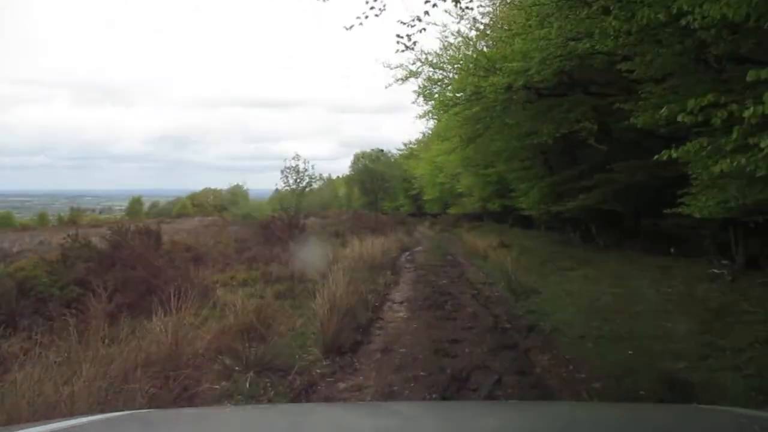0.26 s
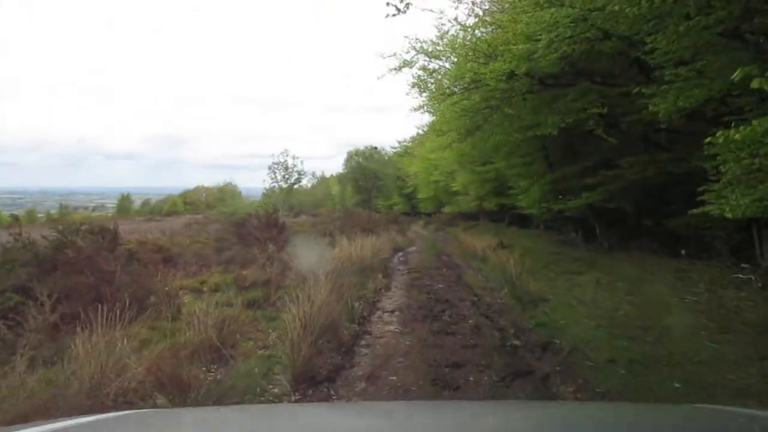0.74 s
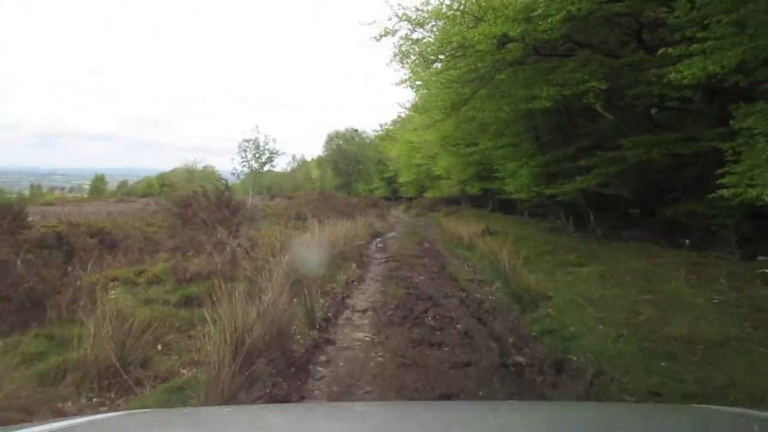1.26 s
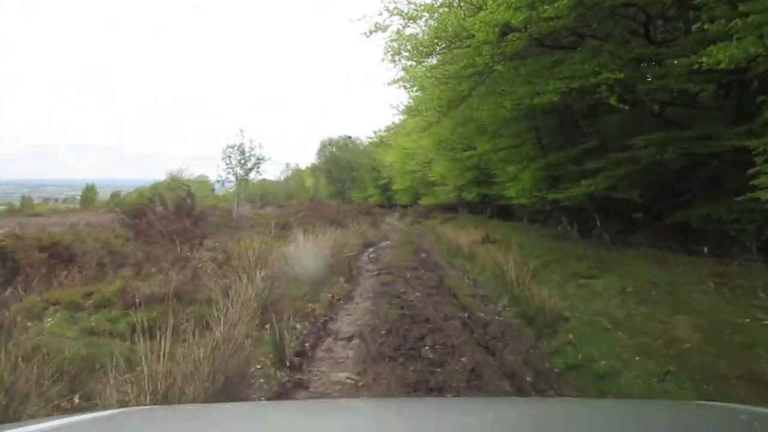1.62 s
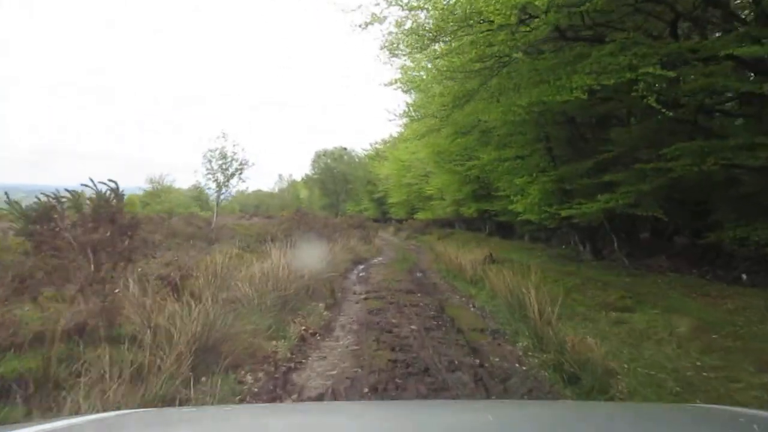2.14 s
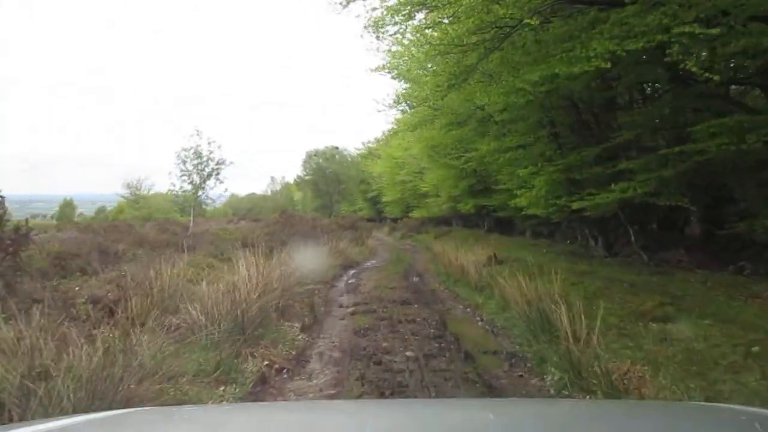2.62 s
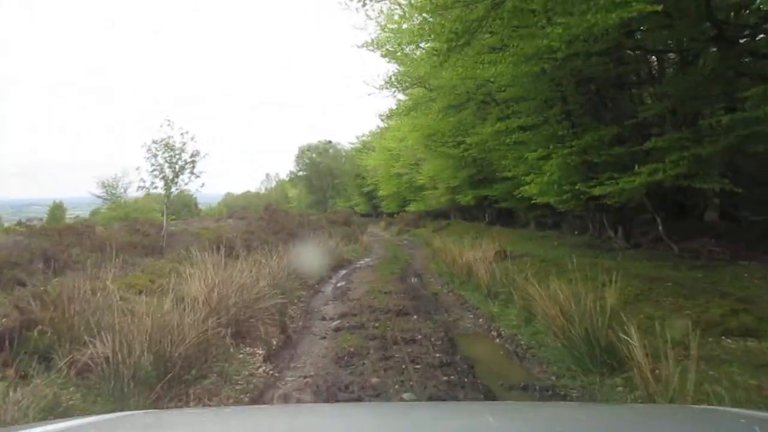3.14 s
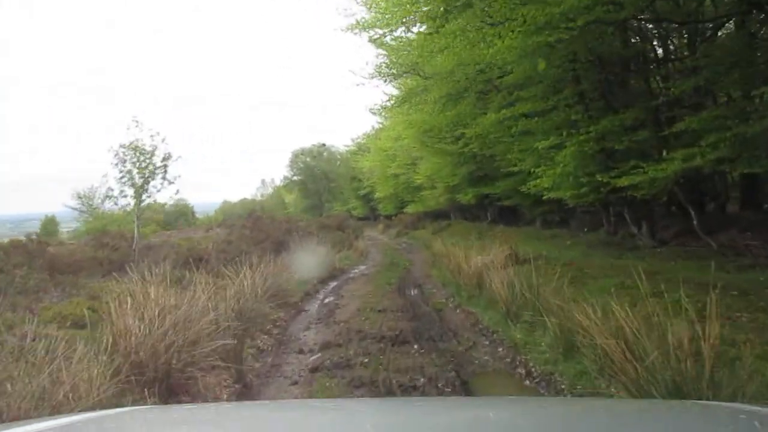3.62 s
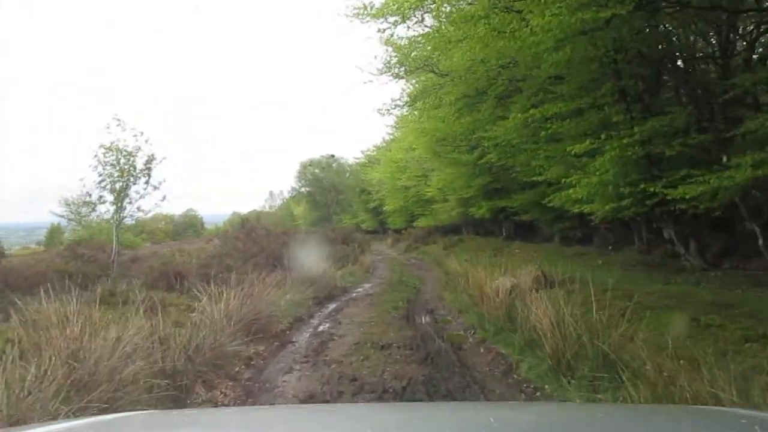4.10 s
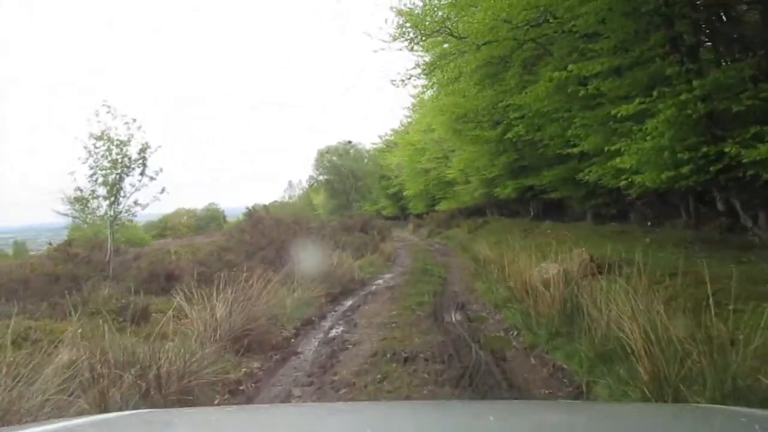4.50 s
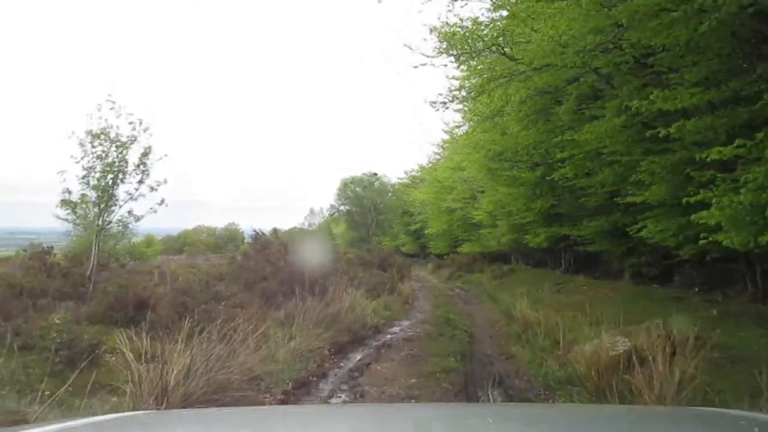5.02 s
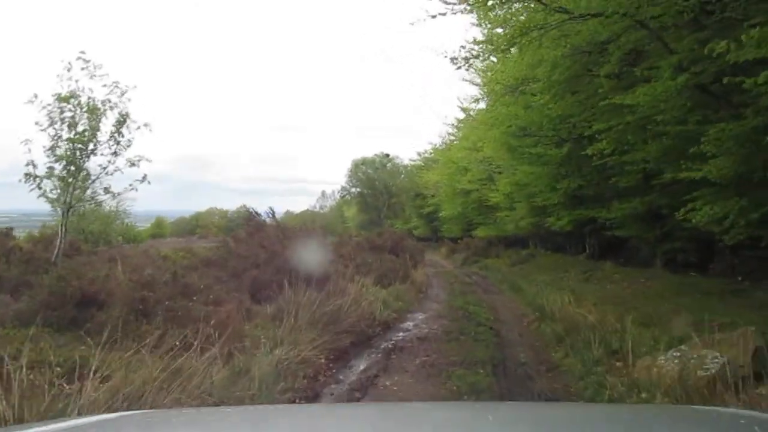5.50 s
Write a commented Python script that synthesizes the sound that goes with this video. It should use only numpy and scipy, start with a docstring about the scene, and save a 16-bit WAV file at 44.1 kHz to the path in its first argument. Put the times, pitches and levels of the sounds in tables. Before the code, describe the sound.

Inside a small off-roader crawling along a muddy rutted track: low steady engine drone, tyre rumble, suspension thumps and rattling trim.

```python
"""The engine of a small four-wheel-drive car drones at nearly steady revs, heard from inside on a rutted muddy track.
It is a sum of wavering firing orders; filtered noise sways the body, and random impacts make tyre rumble and chatter.
Ruts thump the suspension with decaying low tones; noise bursts make pebble taps, trim knocks, ticks and clicks.
Trim judders and a loose fitting clatters in runs of contacts; a small metal piece like a key jingles in decaying modes."""
import sys
import numpy as np
from scipy import signal
from scipy.fft import rfft, irfft, next_fast_len
from scipy.io import wavfile
from scipy.ndimage import uniform_filter1d, map_coordinates

SR = 44100
rng = np.random.default_rng(int(sys.argv[2]) if len(sys.argv) > 2 else 0)


def wav_record(signal):
    """Record a signal, one row per channel, as 16-bit PCM in the file named by sys.argv[1]."""
    frames = np.transpose(np.atleast_2d(signal))
    bounded = np.clip(frames, -1, 1)
    # unit amplitude maps onto the largest positive 16-bit level
    quanta = np.round(bounded * 32767).astype(np.int16)
    wavfile.write(sys.argv[1], SR, quanta)


N = 253575
TIME = np.arange(N) / SR  # seconds
AFTER = np.arange(SR // 4) / SR  # seconds since a blow

# Wheels dropping into ruts. Each row: start in seconds, shell level in dB, shell resonance in Hz,
# low push peak in dB.
RUT_DROPS = [(0.089, -10, 267, -27), (0.42, -31, 136, -7.5), (0.87, -15, 140, -20), (0.984, -17, 320, -21),
             (1.015, -21, 130, -22), (1.213, -26, 137, -21), (1.271, -13.5, 278, -19),
             (1.49, -17, 125, -20), (1.663, -14.5, 138, -18), (1.81, -15, 134, -21), (1.884, -9, 219, -12),
             (1.891, -10.5, 124, -6.5), (2.555, -5.5, 128, -5), (2.56, -15.5, 254, -3),
             (3.342, -13.5, 135, -20), (3.356, -18.5, 262, -29), (3.592, -18.5, 475, -21),
             (3.657, -5, 142, -11), (4.355, -17, 306, -12), (4.391, -13, 295, -22), (4.585, -14, 284, -27),
             (4.774, -16, 280, -22), (4.833, -13.5, 302, -22), (5.221, -16, 124, -3),
             (5.348, -11.5, 296, -30), (5.518, -12.5, 291.2, -13), (5.64, -10, 294.4, -12)]
# Colour of trim contacts. Each row: frequency in Hz, level in dB.
TRIM_COLOUR = [(500, -9), (900, 6), (1350, 0), (1900, -3), (2400, -7), (3300, -10.5), (4700, -20),
               (7000, -29), (11000, -36), (15000, -51.5)]
# Colour of hard plastic and of the key's scrape. Each row: frequency in Hz, level in dB.
PLASTIC_COLOUR = [(2000, -37.5), (3800, 10), (4700, 6), (5400, 0.5), (6200, 3.5), (7200, -3.5),
                  (8400, -0.5), (9200, -3), (10300, -4.5), (12000, -4.5), (15500, -15.5)]


def amp(db):
    """Decibels to gain."""
    return 10 ** (np.asarray(db) / 20)


def unit(x):
    """Scale to rms 1."""
    return x / np.sqrt(np.mean(x ** 2) + 1e-20)


def curves(rows):
    """One value per sample for each column after the time."""
    s, *cols = np.transpose(rows)
    return [np.interp(TIME, s, c) for c in cols]


def wobble(rate):
    """A smooth random curve, rate knots a second."""
    knots = rng.standard_normal(int(N * rate / SR) + 4)
    return map_coordinates(knots, [TIME * rate])


def colour(x, points, main_hz=1000, lift_db=0, octaves=0.3):
    """Causal filter through (Hz, dB) points, with an optional hump round main_hz."""
    m = 2 * next_fast_len(len(x) // 2 + 4096)
    pitch = np.log2(np.fft.rfftfreq(m, 1 / SR) + 1)
    f, db = np.transpose(points)
    # beyond the outer points the level falls 30 dB an octave
    edge = np.maximum(np.log2(f[0]) - pitch, 0) + np.maximum(pitch - np.log2(f[-1]), 0)
    db = np.interp(pitch, np.log2(f), db) - 30 * edge
    db = db + lift_db * np.exp(-((pitch - np.log2(main_hz)) / octaves) ** 2)
    # folding the cepstrum gives minimum phase, so nothing sounds before its blow
    cepstrum = irfft(np.log(amp(db) + 1e-6))
    cepstrum[1:m // 2] *= 2
    cepstrum[m // 2 + 1:] = 0
    return irfft(rfft(x, m) * np.exp(rfft(cepstrum)))[:len(x)]


def resonate(x, modes):
    """Pass x through (Hz, width in Hz, dB) resonances."""
    f = np.fft.rfftfreq(2 * N, 1 / SR)
    response = sum(amp(db) * 1j * f * w / (c * c - f * f + 1j * f * w) for c, w, db in modes)
    return irfft(rfft(x, 2 * N) * response)[:N]


def grains(rate, spread_db):
    """Random tiny impacts of uneven size, rate a second, rms 1."""
    hits = (rng.random(N) < rate / SR) * rng.choice([-1, 1], N)
    size_db = spread_db * np.clip(rng.standard_normal(N), -2, 2)
    return unit(hits * amp(size_db))


def burst(t60):
    """The dying scatter of one contact: noise that falls 60 dB in t60 seconds."""
    return rng.standard_normal(len(AFTER)) * amp(-60 * AFTER / t60)


def add(track, s, db, sound):
    """Lay a sound on the track at s seconds with this peak level."""
    part = track[max(round(s * SR), 0):][:len(sound)]
    part += amp(db) * sound[:len(part)] / np.abs(sound).max()


def rattle(rate, spread_db, centre_hz, cycles):
    """Many small contacts, each ringing briefly at its own pitch; rms 1."""
    when, pitch, size = rng.random((int(rate * N / SR), 3)).T[:, :, None]
    hz = centre_hz * 2 ** (2 * pitch - 1)
    t = AFTER[:SR // 32]
    level = amp(spread_db * size ** 2) * centre_hz / hz
    envelope = amp(-60 * t * hz / cycles) * (1 - np.exp(-t * hz / 2))
    rings = level * np.sin(2 * np.pi * hz * t) * envelope
    places = (when * N).astype(int) + np.arange(len(t))
    return unit(np.bincount(places.ravel(), rings.ravel(), N)[:N])


def ground():
    """Levels of stones and lumps under the wheels (dB), and the stoniness about its mean."""
    # Roughness of the track. Each row: time in seconds, stones in dB, lumps in dB.
    roughness = [(0, -30, -27), (0.22, -35, -24), (0.55, -34, -24), (0.95, -34, -21.5), (1.3, -35, -22),
                 (1.72, -37.5, -22.5), (2.1, -40.5, -28), (2.36, -41, -30), (2.55, -36, -26.5),
                 (2.8, -42.5, -30.5), (3.22, -41, -34), (3.6, -37.5, -24.5), (3.87, -38, -28),
                 (4.35, -35, -23.5), (4.72, -35.5, -27), (5.2, -32, -22), (5.5, -36, -28), (5.75, -33, -25)]
    stones_db, lumps_db = curves(roughness)
    return stones_db, lumps_db, stones_db - stones_db.mean()


def ruts(rut_s=0.053):
    """The shake of the car round each rut, 1 for the loudest alone; close ruts add up."""
    loudest_db = max(row[1] for row in RUT_DROPS)
    return sum(amp(db - loudest_db) * np.exp(-((TIME - s) / rut_s) ** 2) for s, db, *_ in RUT_DROPS)


def cabin(x, wet_db=-9, t60=0.08):
    """Glass and roof return a short, close echo; the seats soak up its treble."""
    tail = burst(t60) * (AFTER > .003)
    echo = signal.fftconvolve(x, tail / np.linalg.norm(tail))[:N]
    return x + amp(wet_db) * colour(echo, [(100, 4.5), (4000, 0.5), (15000, -8.5)])


def clicks(level_db=0.0, t60=0.006, tail_db=-20, tail_t60=0.035, lift_db=11):
    """Small hard parts click: one sharp contact, over in milliseconds, with a thin bright tail."""
    # Each row: start in seconds, peak in dB, main pitch in Hz.
    sharp_contacts = [(0.273, -36, 9100), (0.2866, -30, 7500), (0.2887, -19, 13100), (5.6857, -23.5, 10300)]
    # Each row: frequency in Hz, level in dB.
    click_colour = [(2000, -27), (4200, 3), (5300, -3), (7000, -0.5), (8400, 1), (10200, -3), (11700, -2.5),
                    (13500, -11), (15500, -19.5)]
    out = np.zeros(N)
    for s, db, hz in sharp_contacts:
        contact = burst(t60) + amp(tail_db) * burst(tail_t60)
        click = colour(contact, click_colour, main_hz=hz, lift_db=lift_db, octaves=.2)
        add(out, s, db + level_db, click)
    return out


def touches(count=2, rebound_s=0.02, rebound_loss_db=18):
    """Each swing of the key touches its ring and rebounds once, more softly: rows (s, dB)."""
    # Each row: start in seconds, level in dB.
    swings = [(0.001, -32), (0.055, -40), (0.074, -32), (0.429, -41.5), (0.455, -38), (0.899, -48),
              (1.393, -47), (1.462, -54), (1.509, -51), (2.231, -40.5), (2.258, -48), (2.653, -46),
              (4.398, -46), (4.426, -44), (5.342, -31), (5.367, -40.5)]
    return [(s + rebound_s * k, db - rebound_loss_db * k) for s, db in swings for k in range(count)]


def jingles(level_db=-2, scrape_db=-8, rough=0.63):
    """Each touch rings the key's modes at new strengths; rubbing on the ring blurs them."""
    # Modes of the key. Each row: frequency in Hz, level in dB, time to fall 60 dB in seconds.
    key_modes = [(5800, -15, .04), (7400, -18, .05), (11490, 0, .08), (11780, -5.5, .06), (12100, -12, .05),
                 (14930, -6, .06), (15200, -12, .05)]
    out = np.zeros(N)
    for s, db in touches():
        ring = np.zeros(len(AFTER))
        for hz, level, t60 in key_modes:
            # a random walk in phase
            drift = rough * np.cumsum(rng.standard_normal(len(AFTER))) / np.sqrt(SR * 0.00098)
            strength = amp(level + 2.0 * rng.normal() - 60 * AFTER / t60)
            ring += strength * np.sin(2 * np.pi * hz * AFTER + drift)
        scrape = amp(scrape_db) * colour(burst(0.035), PLASTIC_COLOUR)
        add(out, s, db + level_db, ring * (1 - np.exp(-AFTER / 0.0013)) + scrape)
    return out


def faint_ticks(per_s=9.1, over_stones_db=-7.5, centre_hz=6000, spread_db=6):
    """Small ticks at random moments, stronger on stony ground: rows (s, dB, main Hz)."""
    stones_db = ground()[0]
    rows = []
    for when, size, pitch in rng.random((int(per_s * N / SR), 3)):
        db = stones_db[int(when * N)] + over_stones_db - spread_db * size
        rows.append((when * N / SR, db, centre_hz * 2 ** (pitch - .5)))
    return rows


def ticks(level_db=-2.5, tail_db=-19, dull_db=9):
    """Hard plastic parts snap together, each with its own pitch; softer contacts are duller."""
    # Each row: start in seconds, level in dB, main pitch in Hz.
    snaps = [(0.057, -42, 12000), (0.13, -32, 4730), (0.147, -37, 9500), (0.29, -27.5, 7000),
             (0.336, -31, 6470), (0.426, -37, 4300), (0.713, -32.5, 6370), (0.74, -32, 5880),
             (0.858, -35.5, 4830), (0.869, -35, 4200), (0.937, -33, 10000), (0.961, -37, 4200),
             (0.977, -31, 4100), (1.016, -37, 8500), (1.278, -45.5, 5500), (1.395, -35, 5000),
             (1.405, -34, 5090), (1.571, -41, 6000), (1.736, -34, 6100), (1.779, -37, 4850),
             (1.801, -39, 4900), (1.861, -33, 5150), (1.874, -29.5, 5000), (1.893, -33.5, 6000),
             (1.964, -42.5, 10000), (2.231, -36, 4200), (2.346, -40, 6120), (2.406, -47, 5870),
             (2.531, -32, 4480), (2.557, -39, 5500), (2.605, -37, 4900), (2.746, -41, 5260),
             (2.903, -46, 8000), (2.965, -38, 5160), (3.467, -45, 6000), (3.585, -36, 5330),
             (4.394, -41.5, 6000), (4.704, -37, 5120), (5.093, -34.5, 8310), (5.102, -37, 8300),
             (5.144, -40, 7000), (5.183, -42, 6500), (5.279, -34, 4800), (5.34, -34, 6200),
             (5.613, -43, 5600), (5.646, -40, 6000), (5.656, -41.5, 6000), (5.718, -37, 6200)]
    out = np.zeros(N)
    hardest_db = max(row[1] for row in snaps)
    for s, db, hz in snaps + faint_ticks():
        contact = (burst(.013) + amp(tail_db) * burst(.055)) * (1 - np.exp(-AFTER / .002))
        snap = colour(contact, PLASTIC_COLOUR, main_hz=hz, lift_db=5, octaves=.35)
        softness = 1 - amp(db - hardest_db)
        dulled = colour(snap, [(1000, 0.0074), (5000, 0.0058), (15000, -dull_db * softness)])
        add(out, s, db + level_db, dulled)
    return out


def pebbles(per_s=26, over_stones_db=2, centre_hz=2180, spread_db=8, t60=0.025, small_db=5):
    """Stones flung from the tread tap the floor pan at their own pitch; smaller ones are higher and weaker."""
    out = np.zeros(N)
    stones_db = ground()[0]
    for when, size, pitch in rng.random((int(per_s * N / SR), 3)):
        octave = 2 * pitch - 1
        tap = colour(burst(t60), TRIM_COLOUR, main_hz=centre_hz * 2 ** octave, lift_db=16, octaves=.2)
        db = stones_db[int(when * N)] + over_stones_db - spread_db * size - small_db * octave
        add(out, when * N / SR, db, tap)
    return out


def clatters(contacts_per_s=1500):
    """A swelling run of quick contacts rings a loose metal fitting's modes; one sings on afterwards."""
    # Each row: crest in seconds, half length in seconds, level in dB.
    swells = [(0.089, 0.019, -25)]
    # Modes of the fitting. Each row: frequency in Hz, level in dB, time to fall 60 dB in seconds.
    fitting_modes = [(1350, -1, .04), (1630, -2, .28), (1560, -5, .12), (1700, -7, .2), (1825, -2, .08),
                     (1965, -3, .05), (2270, -6, .03), (2600, -11, .025)]
    out = np.zeros(N)
    for s, half, db in swells:
        contacts = grains(contacts_per_s, spread_db=1.5) * np.exp(-((TIME - s) / half) ** 2)
        for hz, level, t60 in fitting_modes:
            mode = np.sin(2 * np.pi * hz * AFTER) * amp(-60 * AFTER / t60)
            add(out, 0, db + level, signal.fftconvolve(contacts, mode)[:N])
    return out


def judders(level_db=0.0, ring_db=-6, dull_db=12):
    """Loose trim rasps in a swelling run of quick contacts that ring its main resonance."""
    # Each row: crest in seconds, half length in seconds, level in dB, main pitch in Hz.
    runs = [(0.086, 0.026, -32, 1780), (0.09, 0.017, -33, 890), (1.845, 0.037, -33.5, 790),
            (1.881, 0.011, -37.5, 2470), (2.54, 0.012, -37.5, 2100), (2.547, 0.048, -39.5, 1120),
            (3.59, 0.0065, -36, 2350), (3.686, 0.046, -41.5, 2201), (3.746, 0.018, -35, 1310),
            (4.448, 0.035, -37.5, 1730), (4.862, 0.031, -31.5, 1390), (5.202, 0.067, -43, 2200),
            (5.642, 0.022, -30, 1390)]
    out = np.zeros(N)
    for s, half, db, hz in runs:
        contacts = grains(900, spread_db=6.5)
        rasp = unit(colour(contacts, TRIM_COLOUR, main_hz=hz, lift_db=14, octaves=.35))
        ring = unit(resonate(grains(900, spread_db=9.0), [(hz, hz / 12, 0)]))
        swell = np.exp(-((TIME - s) / half) ** 2)
        out += amp(db + level_db) * swell * unit(rasp + amp(min(ring_db, 0)) * ring)
    return colour(out, [(100, 0), (3500, 0.0082), (10000, -dull_db)])


def knocks(clack_db=0, hollow_db=-5, ring_db=0, ring_t60=0.027):
    """Trim clacks against the shell and rings briefly; the cavity behind adds a hollow note."""
    # Each row: start in seconds, clack in dB, hollow body in dB, ring in dB, ring pitch in Hz.
    trim_blows = [(0.324, -25.5, -23, -37, 1560), (0.424, -17, -24, -23, 960),
                  (0.893, -22.5, -15.5, -40, 1430), (0.999, -30, -22, -44, 2980),
                  (1.043, -26, -21, -28.5, 1625), (1.872, -26.5, -13, -42, 2570),
                  (1.88, -28, -22, -39, 2180), (2.23, -23.5, -15, -30, 1001),
                  (2.238, -27.5, -18, -44, 1199), (2.406, -31.5, -20, -50, 2660),
                  (2.531, -24.5, -20, -32, 2350), (2.543, -33, -19, -42, 1900),
                  (2.581, -27.5, -24, -43.5, 1698), (2.604, -27.5, -33, -41, 1640),
                  (2.849, -35.5, -24, -42, 1100), (3.583, -22, -18, -28, 1400),
                  (3.649, -29, -26, -36, 1140), (3.703, -25.5, -16, -30, 2330),
                  (3.766, -31, -12, -23.5, 963), (3.963, -27, -9, -36, 1490),
                  (4.201, -29.5, -12, -43, 2090), (4.215, -27, -17, -44, 2067),
                  (4.264, -28, -22, -27, 1301), (4.273, -30, -22, -31, 1910), (4.391, -23, -11, -35, 1190),
                  (4.452, -28.5, -22, -30, 1343), (4.461, -31, -18, -42, 1990),
                  (4.545, -27, -34, -38, 1300), (4.844, -25, -13, -37, 1210), (4.862, -29, -17, -41, 1470),
                  (5.058, -23, -20, -37, 2150), (5.237, -21, -16, -45, 1410),
                  (5.339, -21, -13, -32.5, 3270), (5.347, -24.5, -16, -30, 1080),
                  (5.376, -26, -20, -36, 1000), (5.614, -32, -14, -33, 1270),
                  (5.643, -22.5, -15.5, -38, 1380), (5.69, -23, -13, -25, 1290)]
    # Colour of the cavity. Each row: frequency in Hz, level in dB.
    hollow_colour = [(120, -9), (230, 6), (300, 12.5), (450, 1), (700, -3), (1200, -18)]
    out = np.zeros(N)
    for s, db, body_db, note_db, hz in trim_blows:
        # the surfaces chatter evenly for a few milliseconds before the sound dies away
        fade = amp(-60 * np.maximum(AFTER - .004, 0) / 0.04)
        contact = np.sign(rng.standard_normal(len(AFTER))) * fade
        clack = colour(contact, TRIM_COLOUR, main_hz=hz, lift_db=4.0, octaves=0.17)
        add(out, s, db + clack_db, clack)
        # a close pair of modes beats
        partner = np.sin(2 * np.pi * hz * 1.04 * AFTER + 2 * np.pi * rng.random())
        ring = np.sin(2 * np.pi * hz * AFTER) + 0.38 * partner
        envelope = amp(-60 * AFTER / ring_t60) * (1 - np.exp(-AFTER / 0.0014))
        add(out, s, note_db + ring_db, ring * envelope)
        add(out, s, body_db + hollow_db, colour(burst(0.12), hollow_colour))
    return out


def chatter(panel_db=-2.5, dash_db=-8.5, loose_db=-14.0, grit_db=-59, flutter_db=1.0, crackle_db=-4.5, rut_db=2.0,
            grit_grows=1.13):  # dB of grit for each dB of stones
    """Shaken panels and loose bits chatter while mud and grit spray the wheel arches."""
    # Colour of the panels. Each row: frequency in Hz, level in dB per Hz.
    panel_colour = [(400, -30.5), (700, 5), (900, 2), (1130, -3), (1380, -5), (1750, -9), (2200, -13),
                    (2600, -13.5), (3200, -18), (4200, -29), (5500, -34), (9000, -65)]
    # Dashboard resonances. Each row: frequency in Hz, width in Hz, level in dB.
    dash_modes = [(655, 26, 9.5), (813, 35, -0.5), (968, 33, 4), (1311, 76, 3.5), (1413, 180, 0),
                  (1624, 11, -5.5), (1770, 19, -7), (1950, 30, -20.5), (2270, 120, -27)]
    # Colour of the spray. Each row: frequency in Hz, level in dB per Hz.
    grit_colour = [(2000, -19.5), (3800, 8), (4700, 2), (5500, -2), (6400, -1.5), (7300, -4.5), (8300, -5),
                   (9200, -7), (10100, -7.5), (11500, -11), (13500, -15), (15700, -15)]
    stones_db, lumps_db, stony_db = ground()
    jolt = wobble(35)
    panels = amp(panel_db) * unit(colour(grains(4000, spread_db=-0.5), panel_colour))
    dash_ring = resonate(grains(600, spread_db=3.5), dash_modes)
    dash = amp(dash_db) * unit(colour(dash_ring, [(600, 0.0079), (2600, 0.0019)]))
    loose = amp(loose_db) * rattle(rate=260, spread_db=9, centre_hz=2000, cycles=36)
    stones = unit(signal.fftconvolve(grains(70, spread_db=4), burst(.018))[:N])
    spray = unit(colour(rng.standard_normal(N) + amp(crackle_db) * stones, grit_colour))
    panel_level = stones_db + rut_db * ruts() + flutter_db * jolt
    grit_level = grit_grows * stony_db + grit_db + 2.0 * jolt
    return amp(panel_level) * (panels + dash + loose) + amp(grit_level) * spray


def tyres(boom_db=1.0, roar_db=-27.5, cabin_db=-32, rut_boom_db=4, rut_roar_db=1.0, uneven_db=0.8,
          roar_grows=0.73, roar_lumpy=0.099):  # dB of roar for each dB of stones, and of lumps
    """Tread blocks strike lumps and stones; floor and cabin ring with them."""
    # Colour of the floor's boom. Each row: frequency in Hz, level in dB per Hz.
    floor_colour = [(55, -39), (80, 5), (95, -1.5), (113, -3), (135, 0), (165, -11.5), (200, -2),
                    (235, -10.5), (320, -36.5)]
    # Colour of the tread's roar. Each row: frequency in Hz, level in dB per Hz.
    tyre_colour = [(160, -25.5), (240, 3.5), (280, 0.5), (330, 2), (390, -2), (460, -2.5), (530, -5.5),
                   (610, -11), (800, -17), (1200, -26), (2500, -63.5)]
    # Cabin resonances. Each row: frequency in Hz, width in Hz, level in dB.
    cabin_modes = [(195.8, 27.6, 1), (281, 3.6, -2), (308, 5.8, -1.5), (420.3, 15, -2), (483.3, 9.9, -6.5)]
    stones_db, lumps_db, stony_db = ground()
    boom_level = lumps_db + boom_db + rut_boom_db * ruts()
    boom = amp(boom_level) * unit(colour(grains(700, spread_db=1.0), floor_colour))
    roar = amp(roar_db) * unit(colour(grains(900, spread_db=2.5), tyre_colour))
    ring = amp(cabin_db) * unit(resonate(grains(700, spread_db=5.5), cabin_modes))
    roar_level = roar_grows * stony_db + roar_lumpy * (lumps_db - lumps_db.mean())
    roar_level = roar_level + rut_roar_db * ruts() + uneven_db * wobble(17)
    return boom + amp(roar_level) * (roar + colour(ring, [(100, 0.025), (700, 0.013)]))


def sway(level_db=2, evenness=0.72):
    """The body heaves on its springs and pumps the cabin air."""
    # Each row: time in seconds, body sway in dB before level_db.
    sway_levels = [(0, -20), (0.25, -22.5), (0.74, -15.5), (0.92, -18.5), (1.25, -15), (1.9, -15.5),
                   (2.05, -26), (2.42, -20.5), (2.58, -14.5), (2.87, -28), (3.7, -18), (3.87, -22.5),
                   (4.1, -15.5), (4.5, -17.5), (4.84, -19), (5.05, -15.5), (5.27, -18), (5.75, -21)]
    # Colour of the heaving body. Each row: frequency in Hz, level in dB per Hz.
    body_colour = [(8, -42), (16, -4), (24, 6), (31, 0.5), (40, -3), (52, -3.5), (66, -7.5), (85, -11.5),
                   (120, -34.5)]
    heave = signal.hilbert(colour(rng.standard_normal(N), body_colour))
    # dividing by part of its own swell steadies the noise
    swell = np.sqrt(np.abs(uniform_filter1d(np.abs(heave) ** 2, size=5000)))
    steadied = unit(heave.real / swell ** np.clip(evenness, 0, 1))
    return amp(curves(sway_levels)[0] + level_db) * steadied


def thumps(level_db=-2, t60=0.074, attack=0.007, push_hz=60, push_rise=0.014, shudder_db=-6):
    """A wheel drops: a low push swells and fades, the shell answers with a few heavy cycles, the floor shudders."""
    out = np.zeros(N)
    push_swell = (AFTER / push_rise) ** 2 * np.exp(-2 * AFTER / push_rise)
    push = np.sin(2 * np.pi * push_hz * AFTER) * push_swell
    onset = 1 - np.exp(-AFTER / attack)
    shudder_colour = [(50, 7.5), (240, -6.5), (500, -9.5), (1200, -44.0)]
    for s, db, hz, push_db in RUT_DROPS:
        add(out, s, push_db, push)
        shell = np.sin(2 * np.pi * hz * AFTER) * amp(-60 * AFTER / t60) * onset
        add(out, s, db + level_db, shell)
        shudder = colour(burst(0.044) * onset, shudder_colour, main_hz=hz, lift_db=2.0)
        add(out, s, db + shudder_db, shudder)
    return out


def engine(level_db=-1.7, rough_db=1.0, wander=0.01595):
    """Firing orders boom in the cabin; the rocking mounts make the overtones waver."""
    # Each row: time in seconds, firing rate in Hz before its wander.
    revs = [(0, 64.66), (.9, 65.23), (1.3, 63.74), (1.8, 64.78), (2.2, 62.7), (3.3, 62.42), (4.2, 64.48),
            (4.8, 63.35), (5.75, 64.2)]
    # Each row: time in seconds, drone in dB before level_db.
    drone = [(0, -25), (0.2, -17.5), (0.5, -25.5), (1.35, -16), (1.78, -16.5), (2.2, -16.5), (2.38, -23.5),
             (2.58, -23.5), (2.76, -20), (3.27, -27.5), (3.58, -12.5), (3.87, -24), (4.38, -17.5),
             (4.97, -23), (5.27, -18), (5.42, -24.5), (5.6, -13.5), (5.75, -25)]
    # Each row: multiple of the firing rate, level in dB against the mean drone.
    order_levels = [(.5, -26), (1.5, -15.5), (2, -23), (2.5, -18), (3, -20), (3.5, -20.5), (4, -27),
                    (5, -20), (6, -41), (7, -20.5)]
    firing_hz, = curves(revs)
    drone_db, = curves(drone)
    phase = 2 * np.pi * np.cumsum(firing_hz * (1 + wander * wobble(14))) / SR
    hum = amp(drone_db + 2.04 * wobble(12)) * np.sin(phase)
    for k, db in order_levels:
        # overtones follow the drone's swells half as far
        load_db = (drone_db + drone_db.mean()) / 2 + rough_db * wobble(30)
        order_phase = k * phase + 2 * np.pi * rng.random() + 0.44 * wobble(16)
        hum += amp(db + load_db) * np.sin(order_phase)
    return amp(level_db) * np.sqrt(2) * hum


def scene():
    """Everything as heard from the front seat; the small rattles gain the cabin's echo."""
    rattles = cabin(knocks() + judders() + clatters() + pebbles() + ticks() + jingles())
    return (engine() + sway() + tyres() + chatter() + thumps() + rattles + clicks())[None]


def record(dry, top_hz=15760):
    """Clip at full scale, then keep only what lies below top_hz."""
    hz = np.fft.rfftfreq(2 * N, 1 / SR)
    return irfft(rfft(np.clip(dry, -1, 1), 2 * N) * (hz < top_hz))[:, :N]


dry = scene()
out = record(dry)
wav_record(out)
```